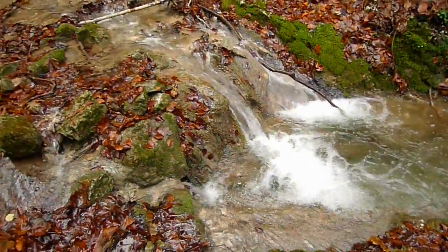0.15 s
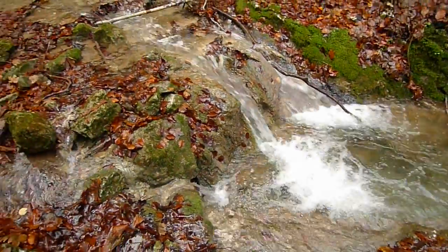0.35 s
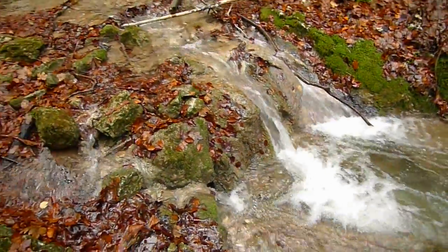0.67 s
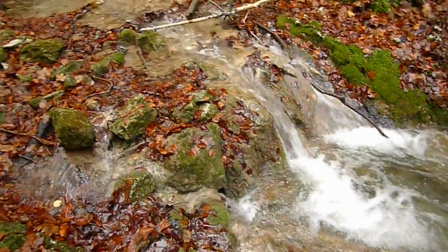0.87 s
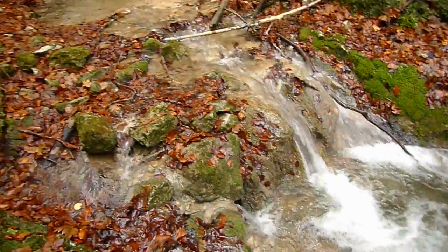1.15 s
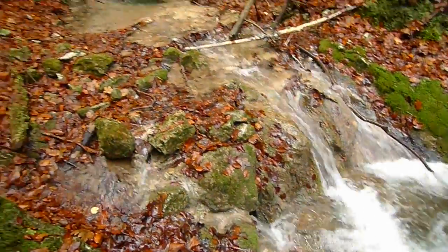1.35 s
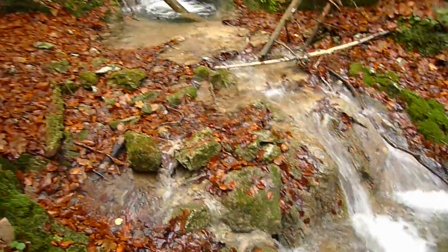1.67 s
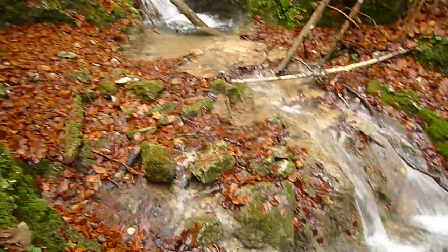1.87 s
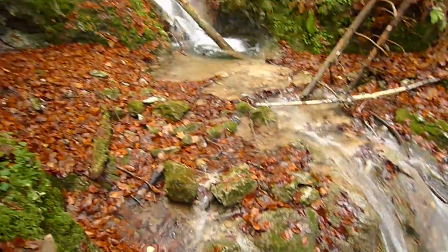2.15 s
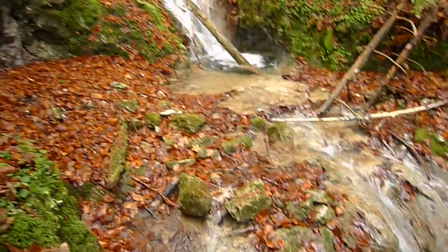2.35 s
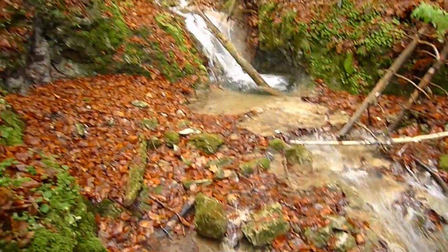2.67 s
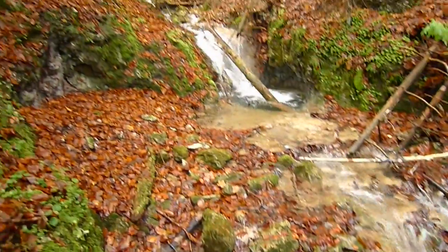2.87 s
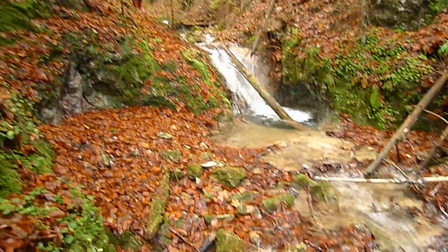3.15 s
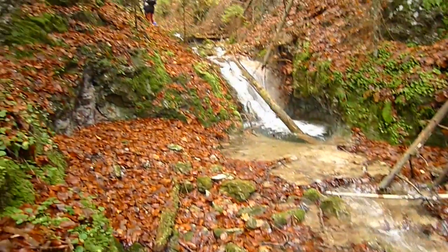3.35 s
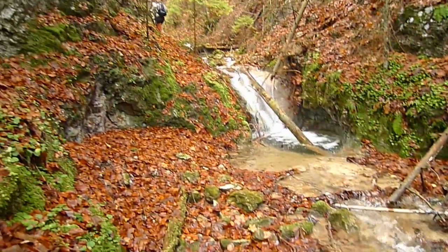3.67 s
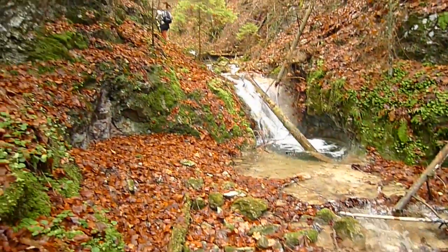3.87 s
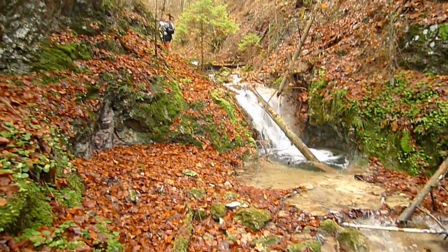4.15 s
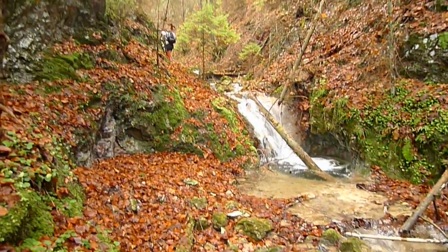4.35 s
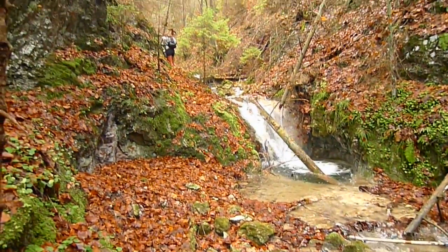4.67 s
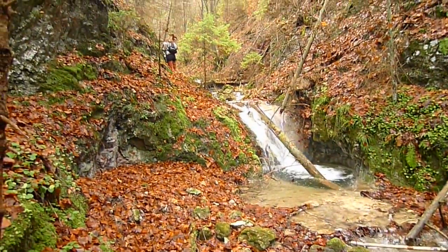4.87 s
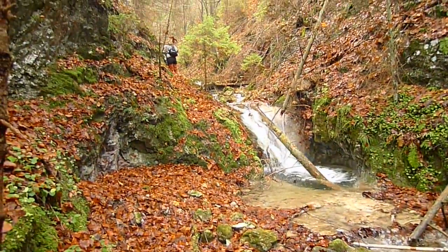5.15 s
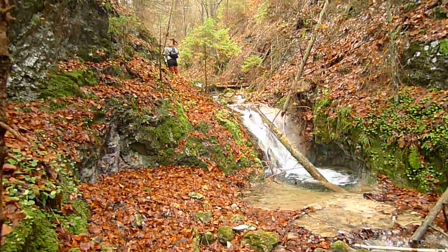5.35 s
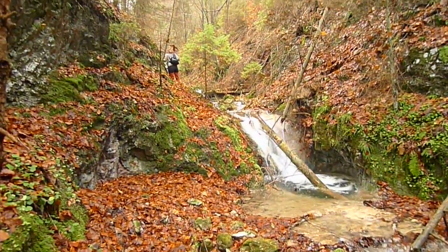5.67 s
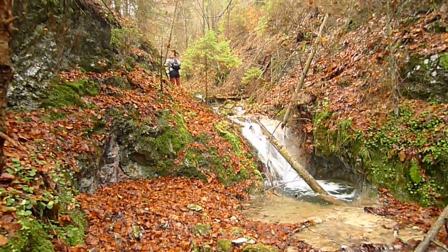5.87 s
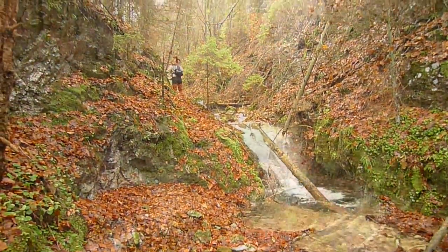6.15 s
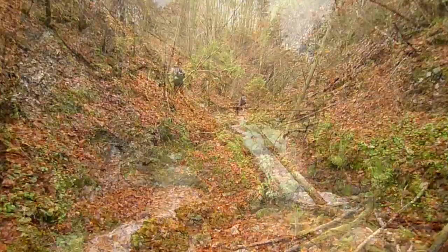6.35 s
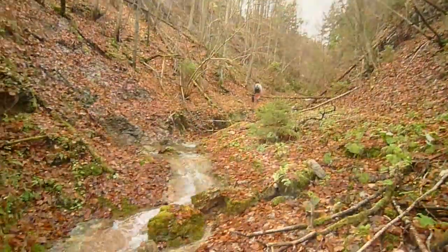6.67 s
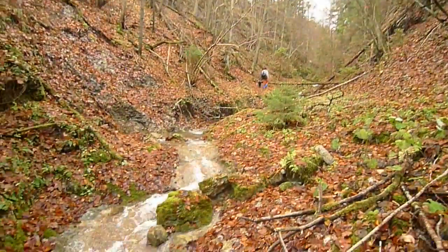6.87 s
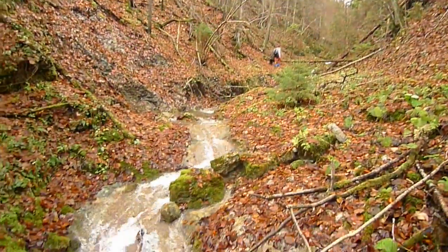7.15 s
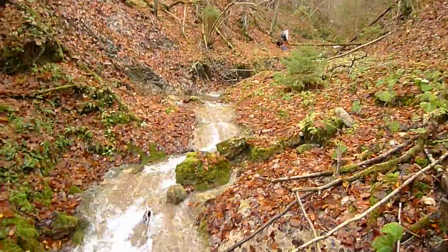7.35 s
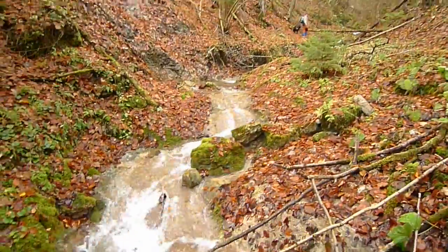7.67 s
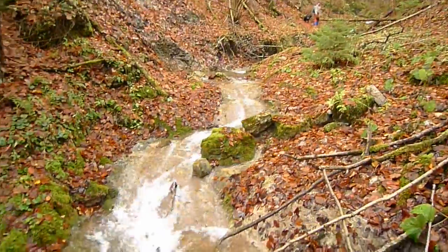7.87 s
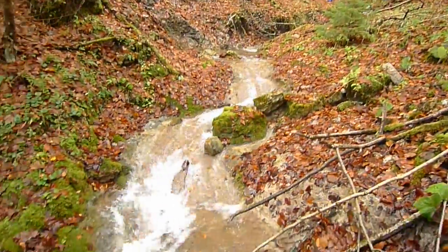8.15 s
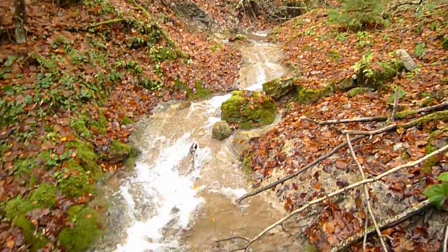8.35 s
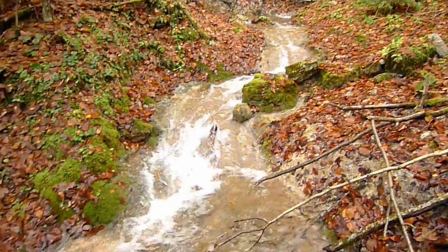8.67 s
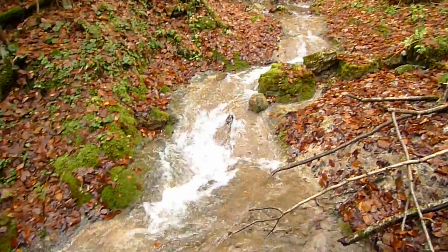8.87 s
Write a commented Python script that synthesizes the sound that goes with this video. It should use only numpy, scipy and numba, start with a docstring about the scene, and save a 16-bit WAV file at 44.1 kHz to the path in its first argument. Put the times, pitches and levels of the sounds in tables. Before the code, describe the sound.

A small stream rushes without pause, heard close through a narrow, muffled camera microphone outdoors. Grainy white water hisses over low gurgles and occasional plops, with brief wind rumble at the start. The tone shifts subtly from a near cascade past wet rock to a higher fall. About six seconds in, a riffle joins abruptly, making it louder and fuller for a second, then continues alone.

```python
"""A forest stream, heard close by through a small camera's narrow microphone that turns from a near cascade,
past a wet rock slab, to a higher fall. A second view over a riffle then enters; for a second both sound.
White water is dense bubble grains over flickering hiss; large bubbles ring as gurgles in the pools.
Loud single plops are short rising rings, and strong peaks make the gain duck. A breeze rumbles under the
first view, a deep rush fades under the second; camera hiss and faint tones lie beneath both."""
import sys
import numpy as np
from scipy import signal
from scipy.fft import rfft, irfft, next_fast_len
from scipy.io import wavfile
from scipy.ndimage import uniform_filter1d
from numba import njit

SR = 44100
rng = np.random.default_rng(int(sys.argv[2]) if len(sys.argv) > 2 else 0)


def unload_wav(signal):
    """Save mono or channel-first audio to the path in sys.argv[1] as 16-bit WAV at rate SR, clipped to [-1, 1]."""
    wavfile.write(
        sys.argv[1],
        SR,
        np.round(np.clip(np.atleast_2d(signal).T, -1, 1) * 32767).astype(np.int16),
    )


def rack_gain(trim_db):
    """Turn a fader trim in dB into the linear factor to multiply a signal by."""
    fader = np.asarray(trim_db, float)
    return 10 ** (fader / 20)


N = 397782
T = np.arange(N) / SR

# Water in each view, ahead of the gain control.
# Each row: time in seconds, white water level in dB rms, steady pool gurgle level in dB.
FIRST_VIEW = [(0, -21, -29), (.7, -21.8, -28), (1.2, -21.5, -30), (2.0, -21.5, -27), (2.9, -22, -28.5),
              (3.5, -22, -30.5), (4.4, -22.5, -27), (5.0, -21, -25.5), (5.8, -23, -25.5), (6.0, -23, -26),
              (6.9, -21.5, -26.5)]
SECOND_VIEW = [(5.9, -18.5, -28), (6.8, -20, -29), (7.0, -21, -29.5), (7.7, -19.5, -31), (8.3, -21, -29.5),
               (8.6, -20, -32.5), (9.0, -18.5, -34.5)]
# Where the microphone points in the first view.
# Each row: time in seconds, direction (0 near cascade, 0.5 rock slab, 1 higher fall).
TURN = [(0, 0.02), (1.2, 0.077), (1.7, .5), (2.5, 0.54), (3.0, 0.96), (6.9, 1)]
# Colour of the white water: near cascade (facing its foot), wet rock slab (half way round),
# higher fall (facing upstream), riffle (second view). Each row: frequency in Hz, relative gain in dB.
NEAR_CASCADE = [(25, -24), (60, -12.5), (110, -7.5), (170, -2.5), (260, -0.5), (560, -3), (800, 2),
                (1000, -2.3), (1200, 1.5), (1450, -1.5), (1750, -0.5), (2050, -8), (2400, -8), (2800, -4),
                (2950, -5)]
ROCK_SLAB = [(25, -25.5), (60, -18), (110, -7), (170, -2), (260, 2), (560, -4), (800, 2), (1000, 0.5),
             (1200, 1.5), (1450, -2.5), (1750, -0.5), (2050, -0.5), (2400, -4.5), (2800, -6.5), (3000, -9)]
HIGH_FALL = [(25, -28.5), (60, -18.5), (110, -6.5), (170, -1.5), (260, 2.2), (560, -1), (800, -0.5),
             (1000, 0), (1200, 1), (1450, 0.9), (1750, -5), (2050, -1.5), (2400, 0), (2800, -4.5)]
RIFFLE = [(25, -28.5), (60, -22.5), (110, -7), (170, 0.5), (260, 1), (560, 3.5), (800, 1.9), (1000, -0.3),
          (1200, 1.3), (1450, 3), (1750, 0), (2050, -2), (2400, -2.5), (2800, -6)]
# Treble cut of the microphone. Each row: frequency in Hz, gain in dB.
MIC = [(2800, 2), (3100, -9), (3400, -15), (3700, -21.5), (4000, -29), (4400, -35.5), (4900, -35),
       (5500, -44.5), (7000, -70), (9000, -95.5)]
# Colour of the camera's own hiss. Each row: frequency in Hz, relative gain in dB.
HISS_COLOUR = [(2000, -2.5), (5500, 2), (6500, 0), (7300, -1), (8000, -5.5), (8600, -10.5), (9200, -17.5),
               (10000, -40), (15000, -37)]
# Faint steady tones. Each row: frequency in Hz, level in dB rms.
WHINE = [(4388, -77), (6223, -88), (6665, -90)]
# Loud single plops. Each row: start in seconds, strength in dB ahead of the filters, starting pitch in Hz.
PLOPS = [(1.279, -3, 520), (1.962, -4.5, 800), (2.102, -5, 800), (3.509, -4, 900), (3.758, -3.5, 500),
         (5.708, -4, 480), (7.228, -2, 600), (8.042, -4.5, 700)]
# Loudest surges of gurgling, when a slug of water drops into a pool.
# Each row: time in seconds, rise above the steady gurgle in dB.
SURGES = [(0.02, 7), (1.25, 6.5), (1.6, 0.5), (1.85, 2), (2.2, 1.5), (3.05, 4.5), (3.31, 7), (3.77, 5),
          (4.17, 2.5), (4.56, 3.5), (6.3, 4), (7.25, 3), (8.03, 3.5), (8.54, 5), (8.82, 7.5)]
# Steady breeze on the microphone, ahead of the gain control. Each row: time in seconds, level in dB.
BREEZE = [(0, -56), (1.2, -55), (1.6, -58), (4, -61), (6.9, -59)]
# Gusts. Each row: time in seconds, rise above the steady breeze in dB, half width in seconds.
GUSTS = [(.22, 11, .06), (.46, 17.5, 0.12), (.76, 7.5, 0.11)]
# Deep rush in the second view, fading as the camera tilts. Each row: time in seconds, level in dB.
DEEP_RUSH = [(5.9, -35), (6.3, -33), (6.7, -33.5), (7.1, -36.5), (7.8, -45), (8.3, -54)]
# Click strengths in dB: where the second view enters, where the first leaves.
CUT_CLICKS = (-18.5, -19.5)

SECOND_IN_S, FIRST_OUT_S = 5.9323, 6.8923
HISS_DB, OFFSET = -65, -.0043  # hiss in dB rms; converter offset as a share of full scale
SURGE_S = 0.076  # half width of a surge
WOBBLE_DB, WOBBLE_PER_S = 1.3, 10  # small random swells of the gurgle
TICK_GAP_S, TICK_DB, TICK_SPREAD = .04, -47, 1.5  # the spread is the power of a random strength


def level(x, db):
    """Scale to an rms level in dB."""
    return x * rack_gain(db) / np.sqrt(np.mean(x ** 2))


def colour(x, points):
    """Filter through (Hz, dB) points, straight on a log-frequency axis."""
    hz, db = np.transpose(points)
    size = next_fast_len(N)
    f = np.arange(size // 2 + 1) * SR / size + 1
    gain = rack_gain(np.interp(np.log(f), np.log(hz), db))
    return irfft(rfft(x, size) * gain, size)[:N]


def walk(rate):
    """Random levels held 1 / rate s and slewed twice; spread 1."""
    hold = int(SR / rate)
    steps = np.repeat(rng.standard_normal(N // 100), hold)[:N]
    smooth = uniform_filter1d(uniform_filter1d(steps, hold), hold)
    return smooth / smooth.std()


def swells(rows):
    """Bell-shaped rises in dB from (s, dB, half width s) rows."""
    return sum(db * np.exp(-.5 * ((T - s) / w) ** 2) for s, db, w in rows)


@njit
def ring(start, hz, cycles, size, glide):
    """Each bubble is a damped sine whose pitch rises as it nears the surface."""
    out = np.zeros(N)
    for k in range(len(start)):
        tau = cycles[k] / hz[k] * SR / 3  # decay in samples: the cycles span three of them
        step = 2 * np.pi * hz[k] / SR
        turn = np.exp(1j * step - 1 / tau)
        rise = np.exp(1j * step * glide / (3 * tau))
        z = size[k] + 0j
        for i in range(start[k], min(N, start[k] + int(5 * tau))):
            out[i] += z.imag
            z *= turn
            turn *= rise
    return out


def bubbles(hz, chance, cycles, scatter_db, glide):
    """Bubbles ring at random moments, a few much stronger than the rest."""
    start = (chance[:, 0] * N).astype(np.int64)
    size = rack_gain(-scatter_db * np.log(chance[:, 1] + 0.0024)) * np.sqrt(hz)
    return level(ring(start, hz, cycles * (.5 + chance[:, 2]), size, glide), 0)


def white_water(points, grain_db, count=14000):
    """Hiss of countless tiny bubbles, flickering, with the larger ones heard as grains; the microphone cuts the top."""
    chance = rng.random((count, 4))
    grains = bubbles(150 + 4300 * chance[:, 3], chance, cycles=6., scatter_db=2.5, glide=0.22)
    hiss = rng.standard_normal(N) * rack_gain(.5 * walk(45))
    return level(colour(hiss + rack_gain(grain_db) * grains, points + MIC[1:]), 0)


def gurgle(low_hz, high_hz, climb, count=3000):
    """Large bubbles under the falling jet, all of about one size; the farther pool is pitched a little higher."""
    chance = rng.random((count, 5))
    hz = low_hz + (high_hz - low_hz) * np.sqrt(chance[:, 3] * (.5 + .5 * chance[:, 4]))
    hz = hz * (.9 + climb[(chance[:, 0] * N).astype(int)])
    x = bubbles(hz, chance, cycles=13., scatter_db=1.8, glide=0.055)
    return level(colour(x, [(.6 * low_hz, -30), (low_hz, 0), (high_hz, 0), (1.12 * high_hz, -22)]), 0)


def breeze():
    """Wind on the microphone: a fluttering low rumble with a few gusts."""
    x = colour(rng.standard_normal(N), [(10, -19.5), (35, -10), (85, 4), (130, -3.5), (250, -37.5), (1000, -110)])
    steady_db = np.interp(T, *np.transpose(BREEZE))
    return level(x * rack_gain(2.6 * walk(12)), 0) * rack_gain(steady_db + swells(GUSTS))


def camera_noise():
    """The camera's coloured hiss, faint steady tones and a constant converter offset."""
    tones = sum(np.sqrt(2) * rack_gain(db) * np.sin(2 * np.pi * (hz * T + rng.random())) for hz, db in WHINE)
    return level(colour(rng.standard_normal(N), HISS_COLOUR), HISS_DB) + tones + OFFSET


def plops(rows):
    """Single bubbles that ring for a cycle or two, rising in pitch, their first swing downward."""
    start_s, db, hz = np.transpose(rows)
    x = ring((start_s * SR).astype(np.int64), hz, 0 * hz + 1.8, rack_gain(db), .3)
    return -colour(x, [(80, -36), (250, 0)] + MIC)  # a bubble this small radiates no bass


@njit
def duck(x, top, depth, hold, release):
    """A downward peak past the top cuts the gain at once; it is held, then creeps back."""
    y, cut, left = np.empty(len(x)), 0., 0.
    for i in range(len(x)):
        y[i] = x[i] * (1 - cut)
        if y[i] < -top:
            left = hold
        if left > 0:
            cut += (depth - cut) * .02
            left -= 1
        else:
            cut *= release
    return y


def deep_rush():
    """Churning water heard as a low band of noise."""
    x = colour(rng.standard_normal(N), [(60, -41.5), (130, -2), (180, 2.5), (240, -8.5), (400, -40), (1000, -110)])
    return level(x, 0) * rack_gain(np.interp(T, *np.transpose(DEEP_RUSH)))


def ticks():
    """Small jumps that settle in about a millisecond: one at each cut, faint random ones evenly between."""
    out = np.zeros(N)
    times = np.arange(SECOND_IN_S, FIRST_OUT_S + TICK_GAP_S / 2, TICK_GAP_S)
    strength = abs(rng.standard_normal(len(times))) ** TICK_SPREAD
    db = TICK_DB + 20 * np.log10(strength)
    db[[0, -1]] = CUT_CLICKS
    out[(times * SR).astype(int)] = rack_gain(db)
    return signal.lfilter([1], [1, -.9], out)


def view(table, water, pool, plop_rows, extra):
    """One camera view: the water and plops pass the gain control and input stage, then camera noise is added."""
    s, flow_db, gurgle_db = np.transpose(table)
    surge_db = swells([(at, db, SURGE_S) for at, db in SURGES]) + WOBBLE_DB * walk(WOBBLE_PER_S)
    x = rack_gain(np.interp(T, s, flow_db)) * water
    x = x + rack_gain(np.interp(T, s, gurgle_db) + surge_db) * pool
    x = x + plops(plop_rows) + extra
    # held 45 ms, released with a 50 ms time constant
    x = duck(x, .39, .23, .045 * SR, 1 - 1 / (.05 * SR))
    # the input stage rounds peaks ahead of its filter
    x = colour(.6 * np.tanh(x / .6), [(4300, 0), (5200, -8), (6500, -40)])
    return x + camera_noise()


def scene():
    """The two views, switched on and off within a few milliseconds."""
    turn = np.clip(np.interp(T, *np.transpose(TURN)), 0, 1)
    waters = white_water(NEAR_CASCADE, -8.0), white_water(ROCK_SLAB, -9.0), white_water(HIGH_FALL, -10.5)
    # equal-power fade from each direction to the next
    turning = sum(np.sqrt(np.clip(1 - abs(2 * turn - k), 0, 1)) * w for k, w in enumerate(waters))
    first_plops = [p for p in PLOPS if p[0] < FIRST_OUT_S]
    second_plops = [p for p in PLOPS if p[0] >= FIRST_OUT_S]
    first = view(FIRST_VIEW, turning, gurgle(270.5, 542.0, .16 * turn - .05), first_plops, breeze())
    riffle = white_water(RIFFLE, -8.5)
    second = view(SECOND_VIEW, riffle, gurgle(260., 570., 0 * turn), second_plops, deep_rush())
    on, off = (np.clip((T - s) / .002 + .5, 0, 1) for s in (SECOND_IN_S, FIRST_OUT_S))
    first_gain = 1 - off ** 2 * (3 - 2 * off)
    second_gain = on ** 2 * (3 - 2 * on)
    return (first * first_gain + second * second_gain + ticks())[None]


def low_pass(x):
    """Removes everything above the highest recorded frequency."""
    return signal.sosfilt(signal.butter(12, 15800, fs=SR, output="sos"), x)


def record(dry):
    """The finished mix as it is kept."""
    return low_pass(dry)


dry = scene()
out = record(dry)
unload_wav(out)
```